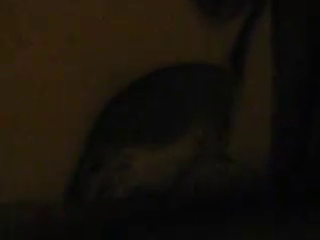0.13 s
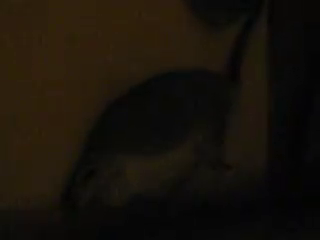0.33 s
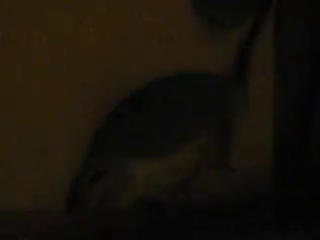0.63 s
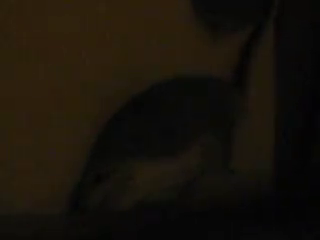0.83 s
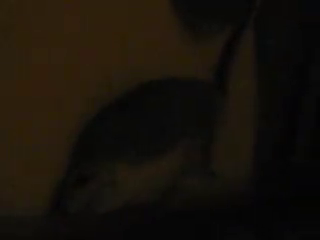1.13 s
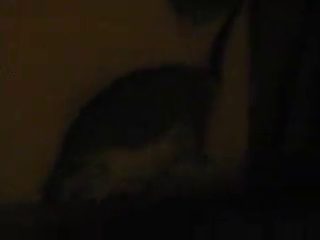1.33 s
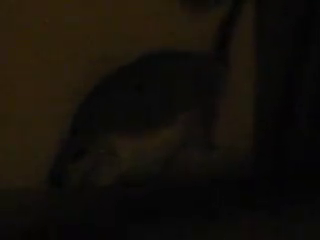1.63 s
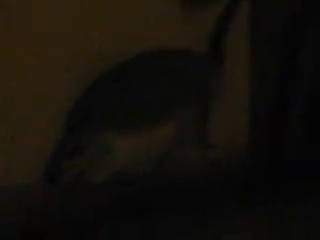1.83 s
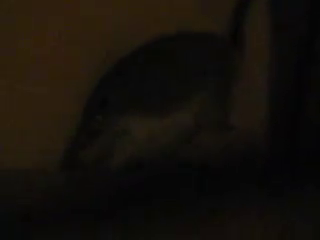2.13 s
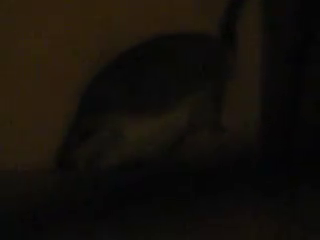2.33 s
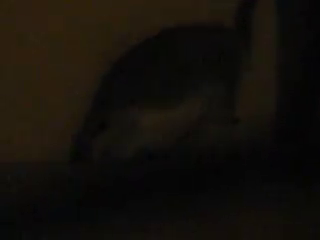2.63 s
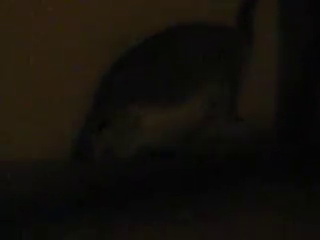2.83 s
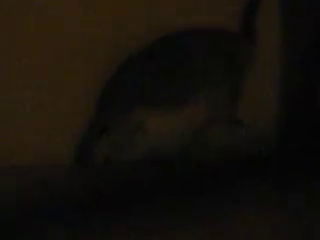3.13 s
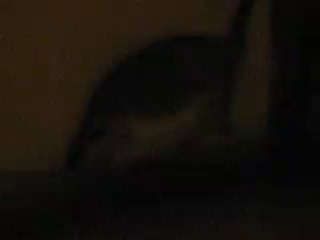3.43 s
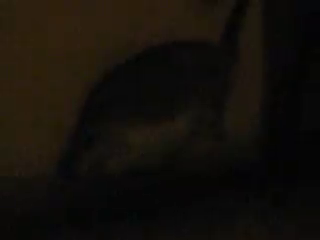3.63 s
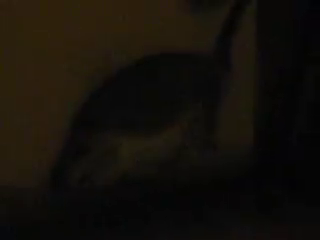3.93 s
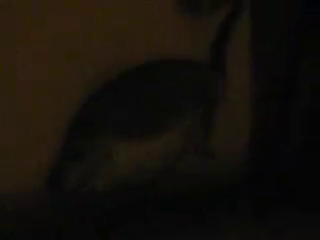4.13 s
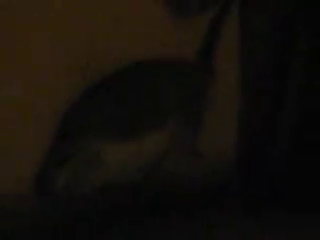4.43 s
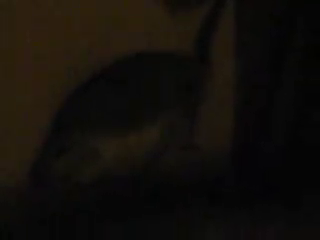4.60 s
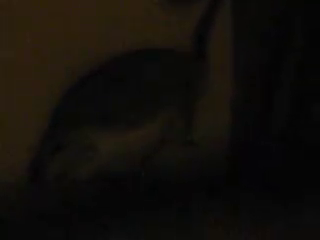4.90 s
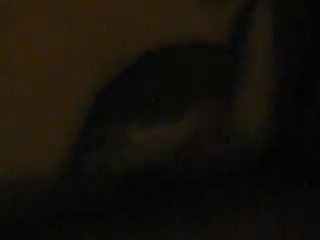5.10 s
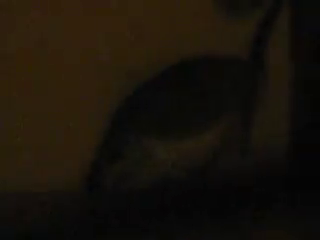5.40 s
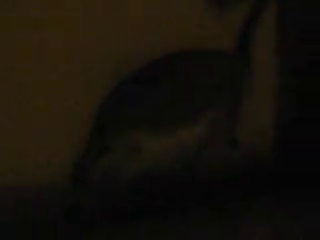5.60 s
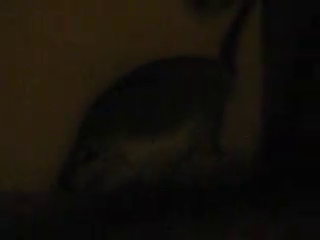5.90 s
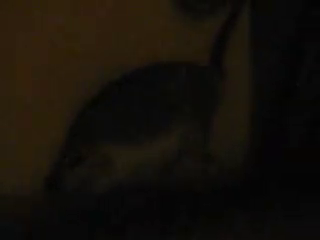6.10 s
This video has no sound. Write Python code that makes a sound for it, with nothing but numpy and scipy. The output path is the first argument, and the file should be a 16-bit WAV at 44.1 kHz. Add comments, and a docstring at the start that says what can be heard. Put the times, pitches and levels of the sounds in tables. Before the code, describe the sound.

Short, piercing mouse squeaks repeat about five times a second, then thin out, leaving faint hum, soft rustles and small bumps.

```python
"""Mouse squeaks in a small room

A mouse squeaks in a rapid run, close to a camera in a small, dead room, with a few softer peeps between. Each
squeak is one near-pure tone that arches up and snaps down; reflections and resonances colour and smear it.
Behind it: mains hum and drone, fan air and ringing as shaped noise, a thin pulsing whine from three sines,
damped noise ticks and bumps, low decaying thuds, and soft noise swells midway and near the end."""
import sys
import numpy as np
from scipy import signal
from scipy.fft import rfft, irfft
from scipy.io import wavfile
from scipy.ndimage import uniform_filter1d

SR = 44100
rng = np.random.default_rng(int(sys.argv[2]) if len(sys.argv) > 2 else 0)


def store_wav(level_fs):
    """Save 16-bit WAV to argv[1]."""
    pcm = np.round(np.clip(np.atleast_2d(level_fs), -1, 1) * 32767)
    wavfile.write(sys.argv[1], SR, pcm.T.astype(np.int16))


N = 275801
TIME = np.arange(N) / SR  # seconds

# Full squeaks. Each row: start in seconds, length in seconds, place of the crest from 0 to 1, crest in Hz,
# level in dB, swell from start to end in dB, attack in seconds, mouth crackle in dB, start pitch in Hz,
# room tail in dB, pitch in Hz at which the nook rings most from this head position, gain of that ring in dB.
# Levels of calls and crackle are relative; add_call trims them.
SQUEAKS = [(-.066, .046, .68, 13420, -8.5, -7, .0014, 3, 7900, 0.5, 10390, -6),
           (0.0926, .041, 0.5, 12870, -12.5, 5, 0.0013, 3.5, 7900, 1, 10450, -5),
           (0.2569, .036, .45, 11310, -8.5, -2, .0017, 0, 7890, -1, 9870, 0),
           (.418, .043, .5, 10160, -10, 1, .0013, 1, 7994, -0.5, 9600, -11),
           (.6, .039, 0.5, 9756, -14.5, -2, .0011, 4.5, 7260, -0.5, 10460, -17.5),
           (0.768, .032, .47, 11030, -9, -3, .0014, -2, 8600, 0, 9360, 1),
           (1.2831, .041, .42, 11190, -9, -2.5, .0012, -1, 8450, 0, 9626, -3),
           (1.4626, .04, .43, 10530, -10.5, -2.5, .0013, 1.5, 8820, 0.5, 9830, -4.5),
           (1.638, 0.044, .48, 11950, -9.5, -1.5, .0021, 1.5, 8440, -1, 10180, -4),
           (1.805, .041, .48, 10190, -9, 0, .0011, 1.5, 8137, -0.5, 9510, -2.5),
           (1.992, .041, .55, 9614, -13, 1.5, .007, 0, 7460, -1.5, 9660, -13),
           (2.1793, .043, .38, 11090, -10.5, -3, .0011, 0, 8220, -0.5, 9870, -5),
           (2.353, 0.046, .5, 10060, -12.5, 10.5, .006, 2, 8310, -2, 9660, -12.5),
           (2.545, .041, .36, 10020, -12.5, 11, .006, 2.5, 8325, -1.5, 10000, -10.5),
           (2.7287, .0329, .5, 11640, -10, 6, .0014, -2.5, 8600, -0.5, 9350, -4),
           (2.9088, .042, .65, 10480, -12.5, 11.5, .003, 0, 8240, 0, 10430, -4.5),
           (3.083, 0.041, .65, 11540, -11, 5.5, .0014, -1.5, 8876, -0.5, 9750, -5),
           (3.2662, .045, .34, 9547, -10.6, -0.5, .0017, -2, 7630, -0.5, 9340, -6.5),
           (3.596, .049, .65, 13530, -16, 12, .0025, 5.5, 7930, 1.5, 10190, -10),
           (3.7771, .049, .47, 10260, -12, -0.5, .0019, 3, 8400, 0, 9920, -9.5),
           (3.96, .041, .46, 10490, -12, 4.5, .0014, -4, 8640, 0, 10430, -9)]
# Softer peeps that glide freely. Each row: start in seconds, length in seconds, place of the crest from 0 to 1,
# crest in Hz, relative level in dB, swell in dB, attack in seconds, relative mouth crackle in dB,
# start pitch in Hz, end pitch in Hz, roundness of the rise and of the fall as exponents.
PEEPS = [(1.137, 0.029, 0.25, 8970, -18, -2.5, .0014, -7, 9070, 8310, 1.3, 1.26),
         (4.16, 0.0087, 0.55, 8370, -30.5, -11, 0.0013, 15, 7730, 8310, 1.5, 1.37),
         (4.178, 0.035, 0.64, 9620, -13.5, -0.5, 0.0027, -2, 9080, 8580, 1.2, 2.9),
         (5.439, 0.038, 0.55, 11670, -17, 10.5, 0.00124, 1.5, 10800, 7960, 0.58, 1.5),
         (5.5925, 0.0034, 0.99, 9600, -35, -9, 0.00098, 19.5, 8130, 9000, 1.3, 1.5),
         (5.596, 0.043, 0.61, 13930, -20.5, 0, 0.0046, 0, 10600, 11900, 1.8, 1.6)]
# The height of the crest sets the shape of a full squeak. Each row: crest in Hz, end pitch in Hz,
# roundness of the rise and of the fall as exponents.
ARCH_SHAPES = [(9534, 8850, 2.1, 2.2), (10136, 9400, 1.8, 2.05), (10900, 9400, 1.3, 1.3),
               (11850, 9300, 1.3, 1.2), (12950, 10200, 1.9, 2.2), (13500, 9700, 1.1, 2)]
# Colour of the direct path, combed by the surface under the mouse. Each row: pitch in Hz, gain in dB.
DIRECT_COLOUR = [(7500, -8), (8400, -9), (8820, -0.5), (9040, -9), (9280, -5), (9600, -1.5), (9900, -2),
                 (10250, 2.5), (10750, -1), (11100, -9), (11750, -11), (12150, -6), (12700, -11.5),
                 (13600, -10.5), (14000, -13)]
# Near surfaces, whose reflections beat against the gliding tone.
# Each row: delay at the left in seconds, delay at the right in seconds, gain in dB.
REFLECTIONS = [(.0021, 0.0019, -18), (.0043, .0039, -12), (.0072, .0078, -17.5)]
# Pitches at which the nook rings on. Each row: pitch in Hz, typical gain in dB, t60 in seconds.
NOOK_MODES = [(8015, -15, .15), (9240, -13, .16), (9560, -14.5, .15), (9950, -15, .15), (10171, -14, 0.17),
              (10700, -17.5, .14), (10990, -14.5, .16)]
# How each pitch reaches the two microphones, before smoothing.
# Each row: pitch in Hz, left minus right in dB, lead of the left in radians.
SIDE_DIFFERENCES = [(7100, -1, 1.3), (8100, -6, 0), (8750, -2, 0.3), (9217, -3.5, -0.38),
                    (9315, -8.5, 0.82), (9610, -1.5, 0.8), (9800, -4, -1.93), (10180, 1, 0.1),
                    (10600, 0, -1.8), (10850, 3, 1.7), (11290, -3, -1.8), (12000, -3, -2),
                    (12150, 3.5, 0.7), (12540, 4, -1.1), (13000, -5, -1.9), (13600, 4, 0)]
# Lines of the mains and the fan. Each row: pitch in Hz, typical level in dB rms.
HUM_LINES = [(59.3, -64), (187, -70.5), (241, -79.5), (300.5, -65.5), (360, -75.5), (757, -83), (1082, -84),
             (1200, -81), (1319, -74.5), (1545, -76.5)]
# Swells of the drone. Each row: time in seconds, level in dB rms.
DRONE_LEVEL = [(0, -62.5), (1.9, -65.5), (2.3, -61.5), (2.9, -64.5), (4.1, -70), (4.48, -64), (4.62, -58.5),
               (5.25, -57), (5.48, -63.5), (6.25, -75)]
# Spectrum of the moving air. Each row: pitch in Hz, relative density in dB per Hz.
AIR_COLOUR = [(20, -2), (45, -2.5), (85, 1), (130, -2.5), (200, -4), (280, -10), (385, -4.5), (600, -13.5),
              (1300, -12), (1600, -14.5), (4000, -20.5), (9000, -23.5), (12500, -29.5), (15000, -33.5)]
# Likeness of the air at the two microphones. Each row: pitch in Hz, correlation.
AIR_LIKENESS = [(60, 0.898), (250, 0.904), (500, 0.85), (1200, .68), (2500, 0.25), (10000, 0.099)]
# Resonances of the fan housing. Each row: pitch in Hz, width of each filter pass in Hz, level in dB rms.
FAN_RINGS = [(401, 27, -76), (866, 25, -72.5)]
# Stretches in which the whine pulses. Each row: start in seconds, stop in seconds.
WHINE_SPANS = [(0, 1.7), (5.5, 6.25)]
# Peak levels of the whine's first three harmonics. Each entry: level in dB.
WHINE_HARMONICS = [-70, -75, -71]
# Small ticks, scuffs and soft bumps. Each row: start in seconds, noise level before the decay in dB rms,
# centre in Hz, width of each filter pass in Hz, t60 in seconds.
KNOCKS = [(0.282, -51.5, 3150, 5000, 0.009), (0.778, -41.5, 2490, 5150, 0.0067),
          (1.312, -51, 801, 1015, 0.065), (1.8255, -47.5, 3000, 4070, 0.011),
          (2.7587, -51, 4000, 4000, .021), (2.95, -46, 5000, 3500, .008), (3.1215, -46.5, 5040, 3500, .008),
          (3.797, -46.5, 4456, 4980, 0.0055), (3.8265, -48.5, 5000, 3500, .008),
          (5.061, -58.5, 1497, 1099, 0.061), (5.066, -47.5, 705, 744, 0.064),
          (5.405, -49.5, 7535, 2200, 0.012), (5.423, -51, 1142, 800, 0.09), (5.484, -58, 3280, 1800, .05),
          (5.529, -51, 1200, 600, 0.027), (5.62, -58, 1600, 1600, .05), (5.648, -57.5, 2990, 2000, .05),
          (5.882, -48, 155.5, 59.96, .093), (6.039, -52, 150, 60, .15), (6.226, -50, 2850, 1205, 0.051)]
# Soft noise swells. Each row: start in seconds, length in seconds, attack in seconds, relative level in dB.
NOISE_SWELLS = [(3.002, 0.46, .1, -6), (5.8, 0.65, 0.19, -1.5), (5.995, 0.21, 0.094, -12)]
# Colour of a swell. Each row: centre in Hz, width of each filter pass in Hz, relative level in dB.
SWELL_BANDS = [(420, 430, -64.5), (1343, 1345, -63.5), (2150, 1100, -66)]
# Soft low thuds. Each row: start in seconds, level before the decay in dB.
THUDS = [(5.882, -43.5), (5.927, -48)]

ARCH_DB = 3.5  # the arch makes the middle of a call this much louder than its ends
STRAIN_HZ, STRAIN_JITTER_PER_HZ = 10620, .0000015  # above this pitch the tone grows more unsteady
SCOOP_HZ, SNAP_HZ = 400, 1350  # dip at the start; half the full drop at the end
LEAP_HZ, LEAP_WIDTH_HZ = 10717, 110  # rising past this pitch, the voice flips towards its crest
LEAP_SHARE = .45  # how much of the way it flips
SETTLE = 1.544  # a full squeak levels off before it snaps down (exponent; 1 = no levelling)
ROOM_T60_S, ROOM_DB, ROOM_GAP_S = 0.088, -10, .003  # each call shifts the tail level
RING_T60_S = .15
DRONE_HZ = 119.4
AIR_DB = -57.5
WHINE_PULSE_HZ, WHINE_FIRST_S, WHINE_DUTY = 10, .045, .36  # first pulse centre; duty as a share of a cycle
SWELL_RELEASE_S = 0.13
THUD_HZ, THUD_T60_S = 82.4, 0.24
TOP_HZ = 16100


def undb(db):
    """Decibels to gain."""
    return 10 ** (np.asarray(db) / 20)


def unit(x):
    """Scale to an rms of one."""
    return x / np.sqrt(np.mean(x ** 2))


def die_away(t, t60):
    """Exponential decay that falls by 60 dB in t60 seconds."""
    return np.exp(-np.log(1000) * t / t60)


def add(out, s, x):
    """Mix x into out from time s on, dropping what falls outside."""
    i = int(s * SR)
    x = x[..., max(-i, 0):N - i]
    first = max(i, 0)
    out[..., first:first + x.shape[-1]] += x


def walk(rate, size):
    """Smooth random wandering with a spread near one; rate is fresh values per second."""
    k = max(int(SR / rate), 1)
    held = np.repeat(rng.standard_normal(size // k + 1), k)
    smooth = uniform_filter1d(uniform_filter1d(held, k), k)
    return 1.18 * smooth[:size]


def band_noise(hz, width_hz, size):
    """Noise passed twice through one resonance for steeper sides, rms one."""
    b, a = signal.iirpeak(min(hz, .45 * SR), hz / width_hz, fs=SR)
    once = signal.lfilter(b, a, rng.standard_normal(size))
    return unit(signal.lfilter(b, a, once))


def along(points, hz):
    """Read (Hz, value) points on a log-frequency axis."""
    f, value = np.transpose(points)
    return np.interp(np.log(hz + 1), np.log(f), value)


def arch_shape(crest_hz):
    """End pitch and roundness of the rise and fall of a full squeak with this crest."""
    crests, *columns = np.transpose(ARCH_SHAPES)
    return [np.interp(crest_hz, crests, column) for column in columns]


def squeak(length, crest, crest_hz, swell_db, attack_s, start_hz, end_hz, rise_bend, fall_bend,
           scoop_hz, snap_hz, leap, settle,
           scoop_s=.0012, snap_s=0.00099, release_s=0.0012, jitter=0.0021, shimmer_db=2.5, rasp_db=-39,
           break_db=-16, break_s=0.0031, break_hz=7900, break_width_hz=2000, rasp_low_hz=5400,
           stop_break_db=2, overtone_db=-27, overtone_below_hz=8450):
    """One arch of throat tension: a tone rises and sags; scoop, leap and snap bend it where they are set."""
    t = np.arange(int((length + release_s) * SR)) / SR
    u = t / length
    rise = np.clip(1 - u / crest, 0, 1) ** rise_bend
    past_crest = np.clip((u - crest) / max(1 - crest, .05), 0, 1)
    fall = 1 - (1 - past_crest ** fall_bend) ** settle
    hz = crest_hz + (start_hz - crest_hz) * rise
    leapt = (1 + np.tanh((hz - LEAP_HZ) / LEAP_WIDTH_HZ)) / 2
    hz = hz + leap * (crest_hz - hz) * leapt
    hz = hz + (end_hz - crest_hz) * fall
    # the folds are slack for an instant as they meet and as they part
    hz = hz - scoop_hz * np.exp(-t / scoop_s) - snap_hz * (1 + np.tanh((t - length) / snap_s))
    unsteady = jitter + STRAIN_JITTER_PER_HZ * np.maximum(hz - STRAIN_HZ, 0)
    phase = 2 * np.pi * np.cumsum(hz * (1 + unsteady * walk(900, len(t)))) / SR
    # the octave sounds only at the low foot of the rise, as a tiny airy tick
    overtone = undb(overtone_db) * np.clip((overtone_below_hz - hz) / 400, 0, 1) * (u < crest)
    tone = np.sqrt(2) * (np.sin(phase) + overtone * np.sin(2 * phase))
    rasp = undb(rasp_db) * band_noise(9280, 1800, len(t))
    # the tone breaks into noise while it starts and stops
    edges = np.exp(-t / break_s) + undb(stop_break_db) * np.exp(-np.abs(t - length) / break_s)
    rasp = rasp + undb(break_db) * edges * band_noise(break_hz, break_width_hz, len(t))
    rasp = signal.sosfilt(signal.butter(2, rasp_low_hz, "high", fs=SR, output="sos"), rasp)
    db = swell_db * (u - .5) - ARCH_DB * (2 * u - 1) ** 2 + shimmer_db * walk(610, len(t))
    gate = np.clip(t / attack_s, 0, 1) * np.clip((t[-1] - t) / (2 * release_s), 0, 1)
    return (tone + rasp) * undb(db) * np.sin(np.pi / 2 * gate) ** 2


def mouth(length, tick_s=0.0048, opening_db=-3, between_db=-7, crackle_db=7, low_hz=1700, high_hz=6000,
          closing_lag_s=0.0063):
    """Moist crackle in ragged noise clusters, a little as the call starts and most as the mouth closes."""
    t = np.arange(int((length + .03) * SR)) / SR
    opening = undb(opening_db) * np.exp(-t / tick_s)
    closing = np.exp(-np.abs(t - length - closing_lag_s) / tick_s)
    shape = opening + closing + undb(between_db) * (t < length)
    ragged = undb(crackle_db * np.tanh(walk(600, len(t))))
    grains = unit(rng.standard_normal(len(t)) * ragged)
    band = signal.butter(3, [low_hz, high_hz], "band", fs=SR, output="sos")
    return signal.sosfilt(band, grains * shape)


def room(tail_db, likeness=0.05, bright_hz=10200, bright_width_hz=2900, linger_db=-20, linger_t60_s=0.21,
         linger_hz=9850, linger_width_hz=1100, patchy_db=3):
    """Response at each microphone: coloured direct sound, near echoes, and a short, partly shared tail."""
    t = TIME[:SR // 4]
    hz = np.fft.rfftfreq(len(t), 1 / SR)
    # folding the cepstrum makes the colour ring after the sound, never before
    cepstrum = irfft(np.log(undb(along(DIRECT_COLOUR, hz))), len(t))
    cepstrum[1:] *= 2 * (t[1:] < t[-1] / 2)
    direct = irfft(np.exp(rfft(cepstrum)), len(t))
    shared, left, right = rng.standard_normal((3, len(t)))
    share = np.clip(likeness, 0, 1)
    diffuse = np.sqrt(share) * shared + np.sqrt(1 - share) * np.array([left, right])
    # echoes arrive in uneven clusters
    diffuse = diffuse * unit(undb(patchy_db * np.tanh(walk(380, len(t)))))
    # the small mouth radiates best in one broad band, and the tail keeps that colour
    diffuse = signal.lfilter(*signal.iirpeak(bright_hz, bright_hz / bright_width_hz, fs=SR), diffuse)
    # the nook dies away quickly; a narrow band lingers faintly
    decay = die_away(t, ROOM_T60_S) * (t > ROOM_GAP_S)
    ring = signal.lfilter(*signal.iirpeak(linger_hz, linger_hz / linger_width_hz, fs=SR), diffuse)
    tail = diffuse * decay + undb(linger_db) * ring * die_away(t, linger_t60_s)
    near = np.zeros((2, len(t)))
    for *delays, db in REFLECTIONS:
        near += undb(db) * np.array([np.roll(direct, int(s * SR)) for s in delays])
    return direct + near + undb(ROOM_DB + tail_db) * tail / np.linalg.norm(decay)


def resonance(hz, db, t60):
    """One narrow resonance with a peak gain of db, met with a chance phase at each microphone."""
    t, rate = TIME[:SR // 4], np.log(1000) / t60
    turns = hz * t + rng.random((2, 1))
    return undb(db) * 2 * rate / SR * np.exp(-rate * t) * np.sin(2 * np.pi * turns)


def nook(scatter_db=1.0):
    """The resonances of the nook, each met with a chance strength."""
    return sum(resonance(hz, db + scatter_db * rng.standard_normal(), t60) for hz, db, t60 in NOOK_MODES)


def add_call(out, s, db, voice, crackle, path, loudness_db=-2.5, crackle_level_db=-30.0):
    """Send a voice and its mouth crackle along one path through the room and mix them in at time s."""
    for sound in (voice, undb(crackle_level_db) * crackle):
        add(out, s, undb(loudness_db + db) * signal.fftconvolve(path, sound[None], axes=1))


def off_axis(x):
    """Each microphone hears its own mix of surfaces, so level and phase between them shift with pitch."""
    hz = np.fft.rfftfreq(N, 1 / SR)
    half = np.array([[.5], [-.5]])
    db, lead = (along(np.array(SIDE_DIFFERENCES)[:, [0, k]], hz) for k in (1, 2))
    response = irfft(undb(half * db) * np.exp(1j * half * lead), N)
    # the surfaces are near, so the response is only a few milliseconds long
    brief = np.exp(-(np.minimum(TIME, N / SR - TIME) / .004) ** 2)
    return irfft(rfft(x) * rfft(response * brief), N)


def mouse():
    """The run of squeaks and peeps; the head moves, so each finds its own path through the room."""
    out = np.zeros((2, N))
    for (s, length, crest, crest_hz, db, swell_db, attack_s, crackle_db, start_hz,
         tail_db, ring_hz, ring_db) in SQUEAKS:
        voice = squeak(length, crest, crest_hz, swell_db, attack_s, start_hz, *arch_shape(crest_hz),
                       SCOOP_HZ, SNAP_HZ, LEAP_SHARE, SETTLE)
        crackle = undb(crackle_db) * mouth(length)
        path = room(tail_db) + nook() + resonance(ring_hz, ring_db, RING_T60_S)
        add_call(out, s, db, voice, crackle, path)
    for s, length, crest, crest_hz, db, swell_db, attack_s, crackle_db, start_hz, *glide in PEEPS:
        voice = squeak(length, crest, crest_hz, swell_db, attack_s, start_hz, *glide,
                       scoop_hz=0, snap_hz=0, leap=0, settle=1)
        crackle = undb(crackle_db) * mouth(length)
        add_call(out, s, db, voice, crackle, room(tail_db=0) + nook())
    return off_axis(out)


def hum(waver_db=1., drift=.002):
    """Mains and fan lines as sines, each wavering slightly in level and pitch."""
    out = 0
    for hz, db in HUM_LINES:
        steadier = min(1, 300 / hz)  # high lines drift by a smaller share
        phase = 2 * np.pi * np.cumsum(hz * (1 + drift * walk(3, N) * steadier)) / SR
        out = out + np.sqrt(2) * np.sin(phase) * undb(db + waver_db * walk(7.4, N))
    return out


def drone():
    """A sine near twice the mains rate that swells and fades."""
    level = undb(np.interp(TIME, *np.transpose(DRONE_LEVEL)))
    return np.sqrt(2) * level * np.sin(2 * np.pi * DRONE_HZ * TIME)


def air(swell_db=-0.04):
    """Soft fan air and hiss: shaped noise, more alike on both sides in the bass."""
    hz = np.fft.rfftfreq(N, 1 / SR)
    likeness = np.clip(along(AIR_LIKENESS, hz), 0, 1)
    colour = undb(along(AIR_COLOUR, hz))
    mid, side = (irfft(rfft(rng.standard_normal(N)) * colour * np.sqrt(1 + sign * likeness), N)
                 for sign in (1, -1))
    return unit(np.array([mid + side, mid - side])) * undb(AIR_DB + swell_db * walk(6, N))


def fan():
    """Air sets the fan housing ringing: narrow noise bands, independent at each microphone."""
    return sum(undb(db) * np.array([band_noise(hz, width_hz, N) for _ in range(2)])
               for hz, width_hz, db in FAN_RINGS)


def whine(hz=1920, edge=0.08):
    """A thin electrical whine of three partials that switches on and off; edge is a share of a cycle."""
    running = sum((TIME > start) & (TIME < stop) for start, stop in WHINE_SPANS)
    from_centre = np.abs((WHINE_PULSE_HZ * (TIME - WHINE_FIRST_S) + .5) % 1 - .5)
    pulses = np.clip(.5 + (WHINE_DUTY / 2 - from_centre) / edge, 0, 1)
    tone = sum(undb(db) * np.sin(2 * np.pi * k * hz * TIME) for k, db in enumerate(WHINE_HARMONICS, 1))
    return running * pulses * tone


def bumps(attack_share=0.0092):
    """Damped noise ticks and knocks; the longer ones also start more softly."""
    out, t = np.zeros(N), TIME[:SR // 3]
    for s, db, hz, width_hz, t60 in KNOCKS:
        envelope = die_away(t, t60) * (1 - np.exp(-t / (attack_share * t60)))
        add(out, s, undb(db) * envelope * band_noise(hz, width_hz, len(t)))
    return out


def noise_swells(flutter_db=-0.8, apart_db=-7, grain_db=2.0):
    """Uneven noise swells that fade in, hold and fade out, partly different at each microphone."""
    swell = 0
    for s, length, attack, db in NOISE_SWELLS:
        fades = np.minimum((TIME - s) / attack, (s + length - TIME) / SWELL_RELEASE_S)
        swell = swell + undb(db) * np.clip(fades, 0, 1)
    mid, side = (sum(undb(db) * band_noise(hz, width_hz, N) for hz, width_hz, db in SWELL_BANDS)
                 for _ in range(2))
    uneven = undb(flutter_db * walk(40, N) + grain_db * walk(500, N))
    return swell * uneven * (mid + undb(apart_db) * side * np.array([[1], [-1]]))


def thud():
    """One low mode, a sine bumped softly and left to die away."""
    out = np.zeros(N)
    ring = die_away(TIME, THUD_T60_S) * np.sin(2 * np.pi * THUD_HZ * TIME)
    for s, db in THUDS:
        add(out, s, undb(db) * ring)
    return out


def scene():
    """The mouse in its nook over the quiet background."""
    background = hum() + drone() + air() + fan() + whine()
    return mouse() + background + bumps() + noise_swells() + thud()


def record(dry):
    """The camera cuts the top with a steep low-pass."""
    return signal.sosfilt(signal.ellip(8, .2, 60, TOP_HZ, fs=SR, output="sos"), dry)


dry = scene()
out = record(dry)
store_wav(out)
```